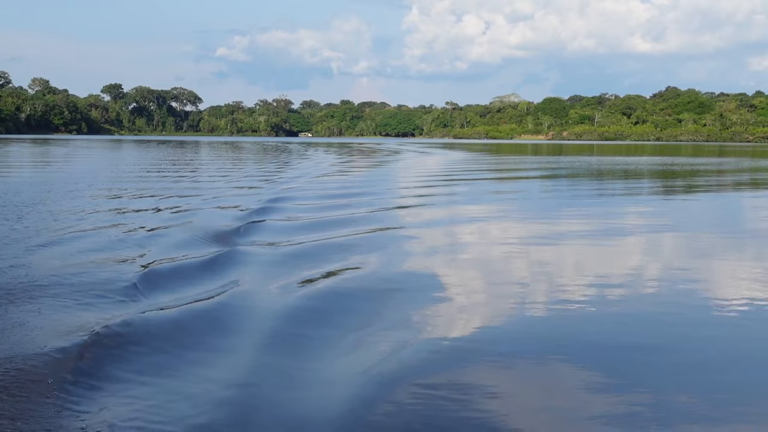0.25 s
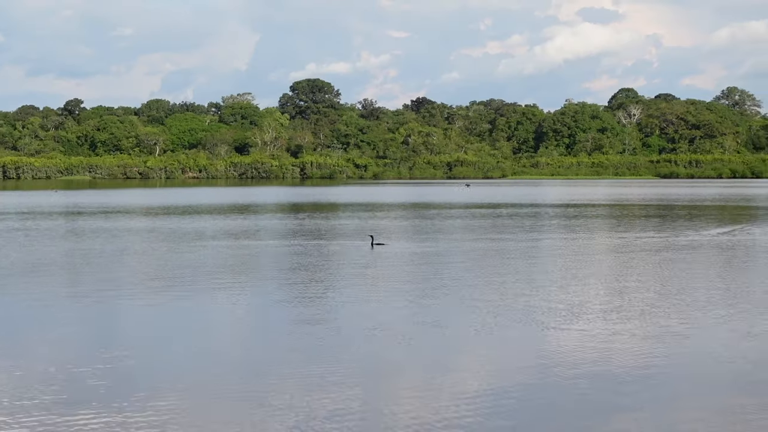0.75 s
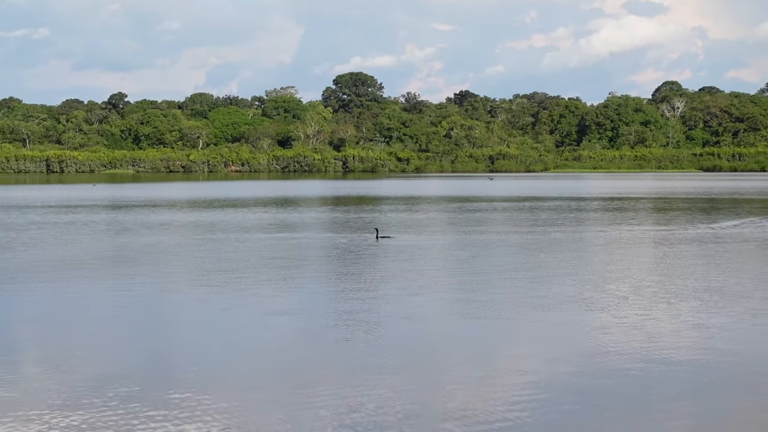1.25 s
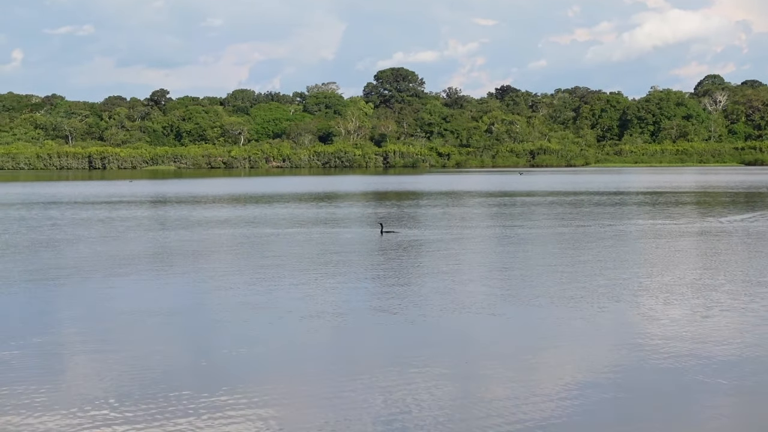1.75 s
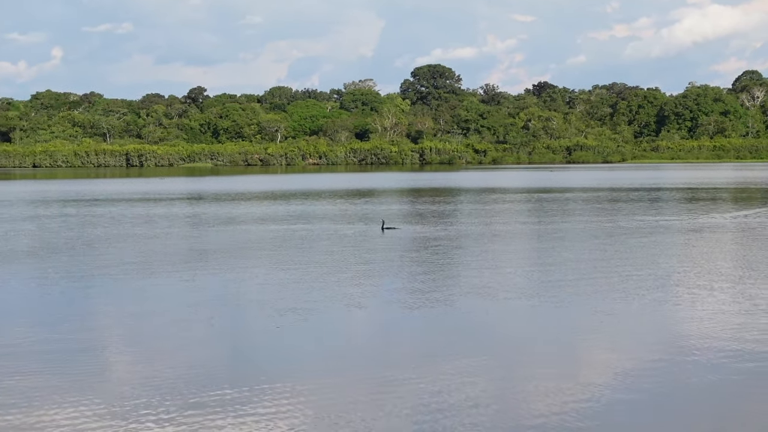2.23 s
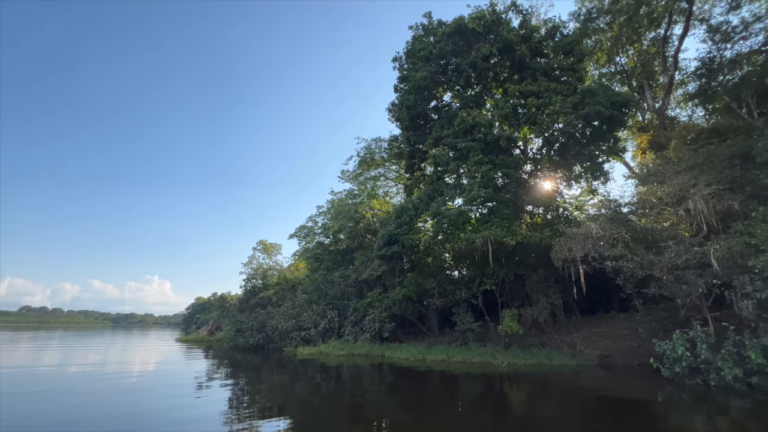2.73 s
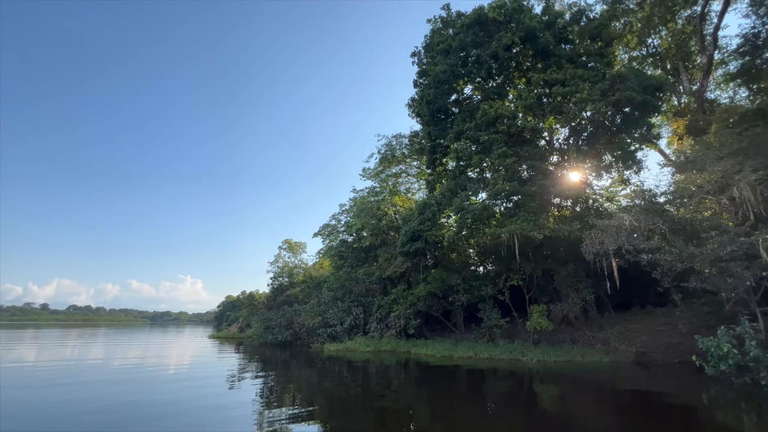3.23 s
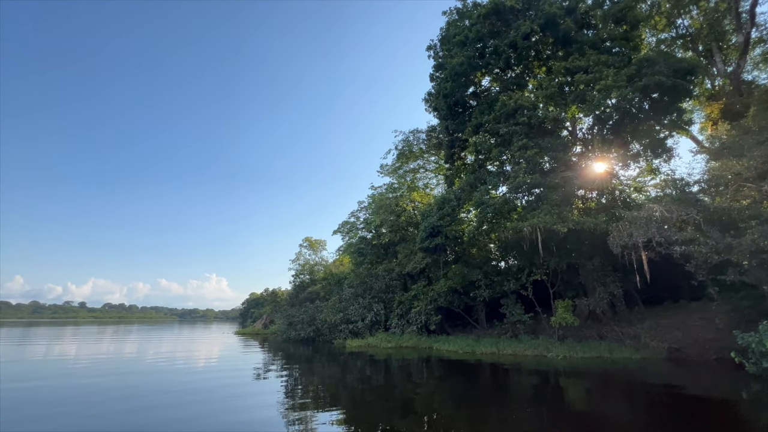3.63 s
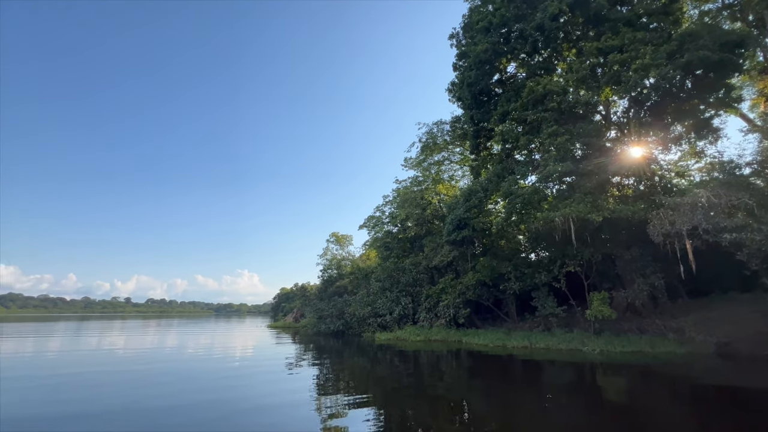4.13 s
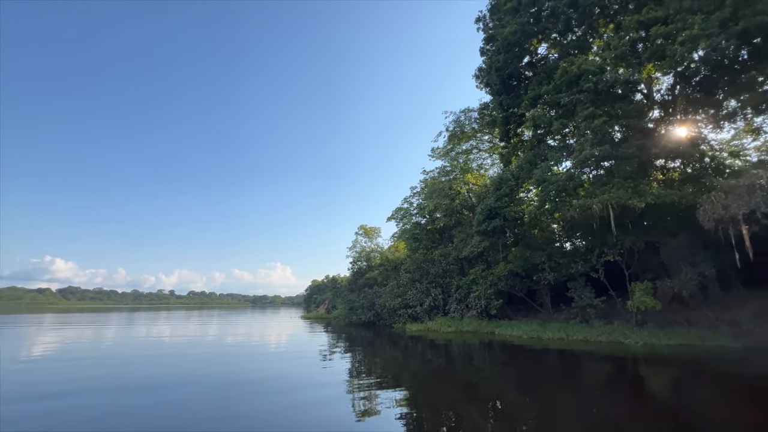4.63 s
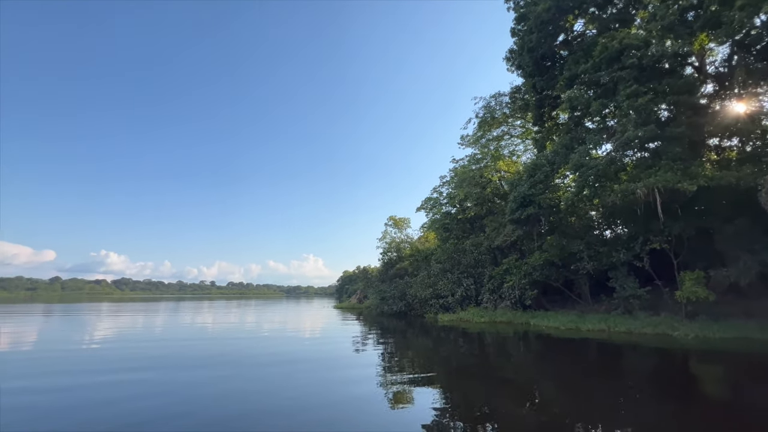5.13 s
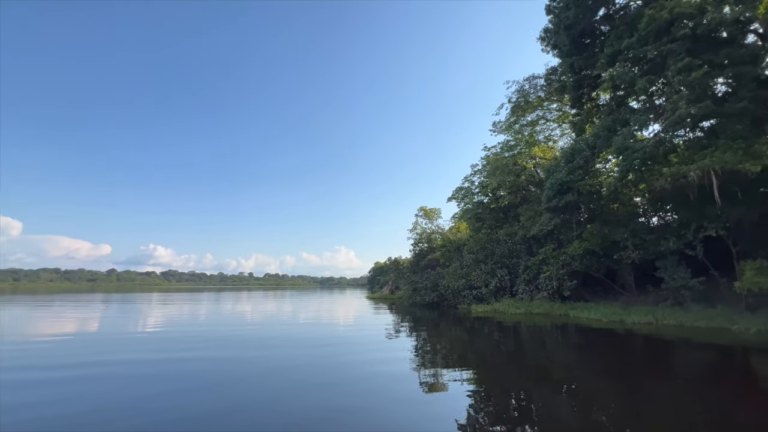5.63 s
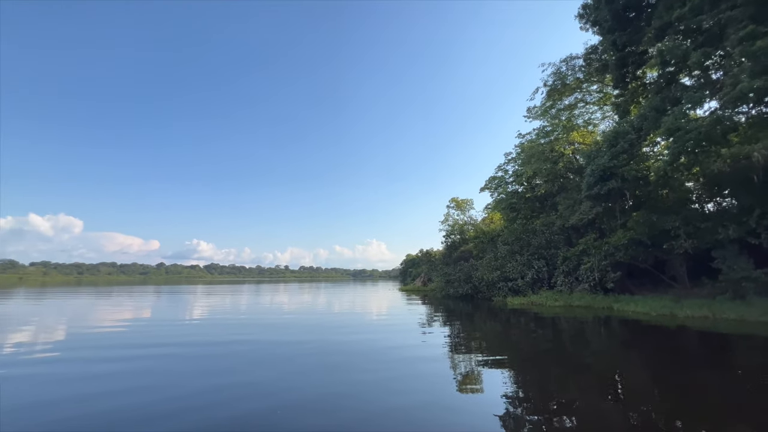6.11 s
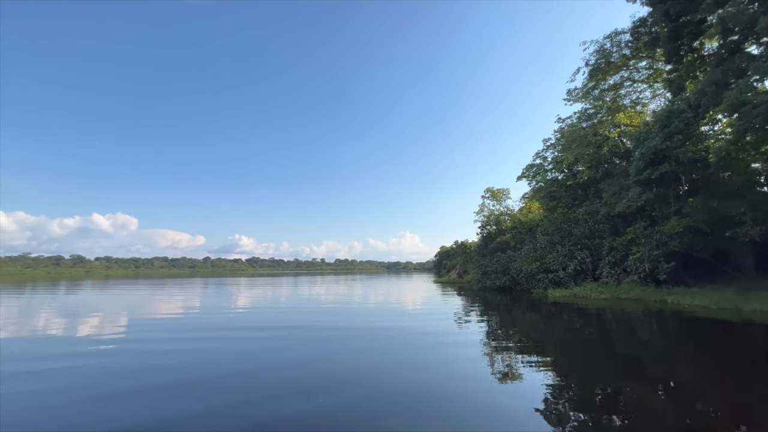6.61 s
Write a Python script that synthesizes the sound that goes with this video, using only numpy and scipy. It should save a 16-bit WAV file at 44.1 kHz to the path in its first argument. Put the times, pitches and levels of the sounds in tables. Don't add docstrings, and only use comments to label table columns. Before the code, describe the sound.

Outdoors on a river boat, close stereo microphone: a steady throbbing motor with exhaust puffs, rattling casing and bright taps, switching abruptly to a second, slightly slower and duller position. The motor drops away and thin, high insect song takes over, very quiet by comparison, with water washing the hull, hissing leaves and brief bird whistles. Light cracks on planks come first, stronger booming knocks later.

```python
import sys
import numpy as np
from scipy import signal
from scipy.fft import rfft, irfft, next_fast_len
from scipy.io import wavfile
from scipy.ndimage import uniform_filter1d

SR = 44100
rng = np.random.default_rng(int(sys.argv[2]) if len(sys.argv) > 2 else 0)


def transcribe(signal):
    frames = np.atleast_2d(signal).T
    limited = np.clip(frames, -1, 1)
    pcm = np.round(limited * 32767).astype(np.int16)
    wavfile.write(sys.argv[1], SR, pcm)


def gain_from_db(level_db):
    decades = np.asarray(level_db, float) / 20
    return 10 ** decades


N = 302526
TIME = np.arange(N) / SR
LATER = TIME[int(2.5 * SR):]
FOREST_TOP_HZ, TOP_HZ = 9700, 15790

# time in seconds, firings a second.
SPEED = [
    [(0.0, 18.17), (0.737, 18.17)],
    [(0.737, 16.4), (1.4, 16.3), (1.5, 16.1), (2.6, 16.1)],
]
FIRST_FIRING = [.04, .36]
# exhaust in dB, casing in dB, clatter in dB, spray in dB.
SEAT_LEVELS = [(-17.5, -13.5, -26, -44.5), (-18.5, -16, -29, -49)]
FADE_OUT_S = (2.284, 2.5915)
# frequency in Hz, left minus right in dB.
SEAT_BALANCE = [
    [(60, -3), (180, -0.5), (550, 1), (1650, 1.5), (4970, 2), (15000, -3)],
    [(60, 2), (180, 1.4), (550, 3), (1650, 6), (4970, 8), (15000, -0.5)],
]
# frequency in Hz, likeness (1 is identical).
SEAT_ALIKE = [(60, .998), (180, 1), (550, 0.99), (1650, .99), (4970, 1), (15000, 0.98)]

# frequency in Hz, level in dB.
ORDER_LEVELS = [(16, -39), (36, -32.5), (70, -11), (95, -4.5), (200, -2.5), (360, -4.5), (470, -11.5)]
ODD_ORDERS_DB = [-0.5, -2]
ORDER_TILT_DB = [1.5, -1]
# frequency in Hz, width in Hz, boost in dB.
PIPE_MODES = [(102.8, 24, 1.5), (164.6, 15, 2), (205, 20, 4), (254.3, 10, 3), (340, 33, 6), (406, 30, -1)]
# start in seconds, length in seconds, order, lift in dB.
HUMS = [(.72, .22, 10, 9), (.9, .22, 12, 8), (1.08, .27, 10, 10), (1.12, .12, 12, 4), (1.28, .18, 16, 5),
        (1.5, .3, 14, 9), (1.54, .22, 12, 7), (1.9, .16, 22, 5), (2.0, .12, 12, 4), (2.1, .14, 13, 6),
        (2.08, .2, 22, 4)]
# frequency in Hz, level in dB.
ROAR_COLOUR = [(20, -83.5), (45, -50), (80, -35), (130, -6.5), (200, -1), (350, -5.5), (520, -15.5),
               (800, -24), (1600, -120)]

# frequency in Hz, level in dB.
CASING_COLOUR = [(100, -120), (250, -28.5), (420, -4), (800, -7.5), (1300, -5.5), (1800, -7.5),
                 (2400, -18.5), (3200, -58), (6000, -120)]
# frequency in Hz, width in Hz, boost in dB.
PANELS = [
    [(551, 37.6, 5.5), (706, 47, 5), (906, 37, 9.5), (1033, 134, 11.5), (1143, 28, 5), (1410, 49, 8.5),
     (1506, 95, 3.5), (2090, 190, 8.5)],
    [(520, 67, 5), (693, 110, 6), (930, 85, 4), (1041, 82, 12), (1401, 25, 7.5), (1524, 68, 4.5),
     (1899, 47, 9.5), (2043, 210, 5.5)],
]
# place as part of a cycle, lift in dB.
VALVES = [
    [(.14, 2), (.54, 4), (.66, 3), (.86, 2)],
    [(.13, 3.5), (.63, 2.5), (.3, 1.5), (.85, 1)],
]
# frequency in Hz, level in dB.
CLATTER_COLOUR = [(800, -120), (1700, -28), (2300, 0), (3000, -5), (4000, -8), (6000, -13), (8000, -21),
                  (11000, -35.5), (16000, -80)]
# frequency in Hz, width in Hz, boost in dB.
FINS = [(2550, 50, 4), (2760, 37, -3), (3035, 53, 5), (3246, 88, 5.5), (3740, 100, -1)]
# place as part of a cycle, dB against the clatter.
COVER_PING = [(.69, 2.5), (.15, -8)]

# frequency in Hz, level in dB.
SPRAY_COLOUR = [(2500, -120), (5000, -29.5), (8000, -3.5), (10000, -5), (13000, -6), (15800, -10.5)]
# frequency in Hz, width in Hz, boost in dB.
SHEEN = [
    [(8710, 500, 3), (9840, 700, 5.5), (12000, 800, 1)],
    [(8500, 600, 1)],
]
# place as part of a cycle, lift in dB.
SPURTS = [
    [(.17, 6), (.63, 1.5), (.9, 4)],
    [(.19, 3), (.68, 2)],
]
SPRAY_DIES_S = (2.5, 2.575)

# time in seconds, peak in dB.
NEAR_TAPS = [(0.0323, -23.5), (0.0937, -29), (0.1426, -25), (0.197, -14.5), (0.2528, -14.5), (0.3072, -14),
             (0.3671, -19.5), (0.4728, -18.5), (0.5033, -17.5), (0.5282, -18), (0.5821, -13.5),
             (0.614, -20), (0.6365, -20.5), (0.6928, -15)]
# time in seconds, peak in dB.
FAR_TAPS = [(0.7673, -29.5), (0.951, -35.5), (0.9804, -32), (1.0118, -29), (1.0736, -32.5), (1.132, -27.5),
            (1.2233, -30.5), (1.2477, -31.5), (1.2824, -29.5), (1.3164, -25), (1.347, -25.5), (1.408, -27),
            (1.4404, -25), (1.5344, -29), (1.5635, -31.5), (1.5959, -28), (1.6897, -29), (1.7484, -26),
            (1.7795, -29.5), (1.8094, -27.5), (1.8753, -29.5), (1.9348, -28), (1.9975, -33.5),
            (2.0918, -29.5), (2.1252, -26.5), (2.1864, -31), (2.245, -33), (2.2769, -39), (2.3088, -35),
            (2.3702, -31), (2.3991, -36), (2.4385, -38), (2.4635, -34.5), (2.4959, -37)]
# frequency in Hz, level in dB.
TAP_COLOUR = [
    [(2500, -58.5), (3800, -7), (5500, -3), (8000, -4), (10000, -17), (15800, -30)],
    [(1800, -61), (3000, -0.5), (5000, 3.5), (7500, -3), (10000, -12), (15800, -15)],
]

# time in seconds, level in dB.
FADE_IN = [(2.53, -25), (2.56, -2.5), (2.59, 0.5)]
# frequency in Hz, half width in Hz, level in dB, left minus right in dB.
INSECTS = [(5320, 250, -85, -7.5), (6016, 260, -53, -4), (6170, 134, -49, -4), (6420, 31, -55, -12),
           (6530, 130, -63, -4), (6800, 170, -52, -2.2), (7000, 80, -47.5, -1.2), (7500, 500, -59.5, -1),
           (8137, 110, -47.5, -3), (8420, 130, -44.5, -1), (8864, 190, -41.5, -1), (9390, 140, -54.5, -1.5)]
# chirp lift in dB, wing-stroke depth in dB.
SINGERS = [(0, 1), (-2, 3.5), (3.5, 2.5), (-3, 1), (1, 1), (5, 1.1), (11, 1.7), (-2, 8), (27, 0.5),
           (7.5, 0.5), (8.5, 0), (9, 2.5)]
# chirps a second, first chirp in seconds, open share, wing strokes a second.
RHYTHMS = [(8, 2.7, .5, 40), (12.42, 2.672, .3, 62), (12.42, 2.672, .25, 49.7), (24.86, 2.685, .35, 49.7),
           (6, 2.7, .5, 45), (3.89, 2.81, .5, 108), (3.89, 2.81, .5, 67), (5, 2.7, .5, 40),
           (12.71, 2.721, .6, 50.83), (12.69, 2.718, .5, 50.8), (14.04, 2.701, .5, 54.5),
           (14.58, 2.676, .5, 48.3)]
# start in seconds, length in seconds, lift in dB.
FAINT_BOUTS = [
    (3.74, .42, 22),
    (4.55, 0.85, 19.5),
    (5.55, 1.25, 22),
]
# start in seconds, length in seconds, lift in dB.
LOW_BOUT = [
    (2.2, 2.52, 4),
]
# start in seconds, length in seconds, share of its lift gained.
SOLO_BOUT = [
    (3.4, 3.25, 1),
]

# frequency in Hz, level in dB.
LAPPING = [(20, -23), (60, -13), (130, -1.5), (200, 1), (400, -3), (700, -11), (1100, -30), (2000, -120)]
# frequency in Hz, level in dB.
WASH = [(200, -120), (500, -0.5), (800, -3.5), (1050, 0.5), (1250, -2), (1550, -0.5), (1800, -6),
        (2800, -10.5), (3400, -22), (5000, -120)]
# frequency in Hz, level in dB.
LEAVES = [(1200, -120), (2400, -4), (3100, -3.5), (4800, -0.5), (5500, 5), (6200, -15), (8000, -120)]
# frequency in Hz, level in dB.
TWIGS = [(2000, -120), (2700, -6.5), (3200, -3.5), (3700, -3), (4200, -12), (5000, -120)]
# start in seconds, length in seconds, lift in dB.
ROCKING = [
    (5.75, 1.3, 3),
]
# start in seconds, length in seconds, lift in dB.
RIPPLES = [
    (3.6, 0.71, 1),
    (4.45, 2.6, 3),
]
# start in seconds, length in seconds, lift in dB.
GUSTS = [
    (3.6, 0.7, 5.5),
    (5.8, 0.85, 4.5),
]
# start in seconds, length in seconds, lift in dB.
FLUTTER = [
    (3.33, .45, 13),
]
# frequency in Hz, level in dB.
AIR = [(12900, -120), (13200, -12), (13800, -6), (14000, 0), (14500, -4), (15650, -6), (15780, -120)]

# time in seconds, crack in dB, boom in dB, snap in dB, left minus right in dB.
KNOCKS = [(3.041, -59, -50.5, -77, 4), (3.129, -63, -48, -81, 4), (3.55, -51, -64, -77, -3),
          (3.83, -70, -70, -58, -1), (3.981, -42.5, -60, -70, 1.5), (4.499, -52.5, -68, -77.5, 1),
          (5.647, -32, -38.5, -59, 1), (5.844, -36, -40.5, -66, 1), (6.353, -38, -41.5, -33, 6),
          (6.393, -44, -46, -58, 1), (6.711, -53.5, -62, -60, .5)]
# frequency in Hz, width in Hz, boost in dB.
PLANK = [(1090, 74, -2.5), (1268, 70, 6.5), (1450, 86, -2), (1690, 240, 0), (2130, 400, 7),
         (2630, 180, 4.5), (2964, 140, 6)]
# frequency in Hz, width in Hz, boost in dB.
HULL = [(135, 28, 10), (192, 14, 14.5), (260, 72, 10.5), (409, 33, 10), (604, 42, 1)]
# start in seconds, frequency in Hz, level in dB, 60 dB decay in seconds.
HULL_DRUM = [(5.66, 231, -41.5, 0.51), (5.68, 135, -43, 0.52), (5.871, 135, -45.5, 0.56),
             (5.87, 260, -43.5, 0.58), (6.362, 315, -39, 0.36), (6.369, 236, -37, 0.22),
             (6.412, 192, -27.5, 0.26), (6.445, 198, -35, 0.23), (6.362, 630, -43, 0.13),
             (6.394, 583, -51, .15), (6.4, 297, -40, .3), (6.399, 390, -41, .25), (6.465, 297, -41, 0.25),
             (6.48, 188.5, -40, .3), (6.5, 399, -46, 0.25), (6.565, 217, -42, 0.22)]
# start in seconds, length in seconds, from Hz, to Hz, level in dB.
BIRD = [(3.44, .04, 3850, 3830, -67), (3.49, .04, 3520, 3680, -68), (3.545, .03, 3600, 3400, -70),
        (3.585, .035, 3460, 3440, -72), (3.62, .035, 3480, 3780, -63), (3.655, .045, 3780, 3520, -61),
        (3.7, .055, 3520, 3350, -65), (3.826, .012, 4350, 3750, -62), (4.065, .02, 4560, 4520, -68),
        (4.12, .025, 4480, 4520, -64), (4.18, .06, 4520, 4400, -71), (5.88, .08, 4300, 4250, -76),
        (6.06, .08, 3500, 3350, -74)]


def unit(x):
    return x / np.sqrt(np.mean(x ** 2) + 1e-20)


def along(points, hz):
    f, v = np.transpose(points)
    return np.interp(np.log(hz + 1), np.log(f + 1), v)


def colour(points):
    return lambda hz: gain_from_db(along(points, hz))


def curve(rows, t):
    s, values = np.transpose(rows)
    return np.interp(t, s, values)


def wobble(rate, size):
    knots = rng.standard_normal(int(size * rate / SR) + 4)
    return np.interp(np.arange(size) * (rate / SR), np.arange(len(knots)), knots)


def boosts(modes, hz):
    peaks = sum(gain_from_db(db) ** 2 / (1 + (2 * (hz - c) / w) ** 2) ** 2 for c, w, db in modes)
    return np.sqrt(1 + peaks)


def noise(size, gain, alike, balance_db):
    m = next_fast_len(size)
    hz = np.fft.rfftfreq(m, 1 / SR)
    angle = np.arccos(np.clip(alike(hz) + 0 * hz, -1, 1)) / 2
    mid, side = rfft(rng.standard_normal((2, m))) * gain(hz) * [np.cos(angle), np.sin(angle)]
    left = (mid + side) * gain_from_db(balance_db(hz) / 2)
    right = (mid - side) * gain_from_db(-balance_db(hz) / 2)
    return unit(irfft(np.array([left, right]), m)[:, :size])


def seat_noise(seat, size, gain):
    return noise(size, gain, lambda hz: along(SEAT_ALIKE, hz), lambda hz: along(SEAT_BALANCE[seat], hz))


def bumps(cycle, places, width):
    return sum(db * np.exp(-((cycle - at) % 1) / width) for at, db in places)


def swells(events, t=LATER, swell_s=0.15):
    return sum(db * np.clip(np.minimum(t - s, s + length - t) / swell_s, 0, 1) for s, length, db in events)


def below(x, top_hz):
    m = next_fast_len(x.shape[1] + SR // 10)
    return irfft(rfft(x, m) * (np.fft.rfftfreq(m, 1 / SR) < top_hz), m)[:, :x.shape[1]]


def firing_orders(seat, rate, t, cycle):
    size = len(rate)
    order = np.arange(1, 27)
    hz = order * rate.mean()
    order_db = along(ORDER_LEVELS, hz) + ODD_ORDERS_DB[seat] * (order % 2)
    order_db = order_db + ORDER_TILT_DB[seat] * np.log2(hz / 200)
    strength = gain_from_db(order_db) * boosts(PIPE_MODES, hz)
    thump_db = 4 * np.clip((16.25 - rate) / .15, 0, 1)
    tones = np.zeros(size)
    for k, gain in zip(order, strength):
        hum_db = swells([(s, length, db) for s, length, which, db in HUMS if which == k], t, 0.047)
        lift_db = thump_db * (k in (5, 6, 8)) + hum_db + min(.15 * k, 2) * wobble(5, size)
        drift = .006 * k * k + min(.11 * k, 1) * rng.normal() + .045 * k * wobble(5, size)
        tones += gain * gain_from_db(lift_db) * np.cos(2 * np.pi * k * cycle + drift)
    return tones * gain_from_db(1.2 * wobble(16.8, size))


def exhaust(seat, rate, t, cycle):
    size = len(rate)
    tones = firing_orders(seat, rate, t, cycle)
    puff = gain_from_db(bumps(cycle, [(0, 4.1), (.5, 2.69)], width=0.14))
    roar = puff * seat_noise(seat, size, colour(ROAR_COLOUR))
    mix = 0.8 * unit(tones) * gain_from_db([[.3], [-.3]]) + .5 * unit(roar)
    return mix * signal.windows.tukey(size, 400 / size)


def casing(seat, cycle):
    size = len(cycle)
    shake = gain_from_db(bumps(cycle, [(.25, 1.8), (.8, 0.66)], width=0.058) + 0.99 * wobble(31.05, size))
    return shake * seat_noise(seat, size, lambda hz: colour(CASING_COLOUR)(hz) * boosts(PANELS[seat], hz))


def clatter(seat, cycle):
    size = len(cycle)
    strikes_db = bumps(cycle, VALVES[seat], width=.055) * (1 + .4 * wobble(18, size))
    metal = seat_noise(seat, size, lambda hz: colour(CLATTER_COLOUR)(hz) * boosts(FINS, hz))
    valves = gain_from_db(strikes_db + 1.2 * wobble(39.55, size)) * metal
    at, ping_db = COVER_PING[seat]
    struck = gain_from_db(ping_db + 2.5 * wobble(18, size)) * np.exp(-((cycle - at) % 1) / .12)
    cover = seat_noise(seat, size, lambda hz: 1 / (1 + ((hz - 2600) / 160) ** 4))
    return unit(valves) + struck * cover * 2


def spray(seat, cycle):
    size = len(cycle)
    spurts_db = 0
    for at, db in SPURTS[seat]:
        distance = (cycle - at + .5) % 1 - .5
        spurts_db = spurts_db + db * np.exp(-np.square(distance / 0.0786))
    gate = gain_from_db(spurts_db * (1 + 0.26 * wobble(25, size)) + 1.06 * wobble(25, size))
    return gate * seat_noise(seat, size, lambda hz: colour(SPRAY_COLOUR)(hz) * boosts(SHEEN[seat], hz))


def engine(seat):
    rows = SPEED[seat]
    span = slice(round(rows[0][0] * SR), round(rows[-1][0] * SR))
    t = TIME[span]
    rate = curve(rows, t)
    cycle = np.cumsum(rate) / SR - FIRST_FIRING[seat]
    exhaust_db, casing_db, clatter_db, spray_db = SEAT_LEVELS[seat]
    level = gain_from_db(4 * (rate[-1] - rate)) * np.interp(t, FADE_OUT_S, [1, 0])
    parts = gain_from_db(exhaust_db) * unit(exhaust(seat, rate, t, cycle))
    parts += gain_from_db(casing_db) * unit(casing(seat, cycle))
    parts += gain_from_db(clatter_db + 2.5) * unit(clatter(seat, cycle))
    parts += gain_from_db(spray_db + 4.0) * unit(spray(seat, cycle)) * np.interp(t, SPRAY_DIES_S, [1, 0])
    out = np.zeros((2, N))
    out[:, span] = level * parts
    return out


def taps(seat):
    rows = (NEAR_TAPS, FAR_TAPS)[seat]
    tap_db, rise_s, t60_s = [-8.5, 2][seat], 0.00096, 0.037
    t, out = TIME[:SR // 20], np.zeros((2, N))
    for s, db in rows:
        burst = gain_from_db(db + tap_db - 60 * t / t60_s) * (1 - np.exp(-t / rise_s))
        out[:, round(s * SR):][:, :len(t)] += burst
    span = slice(round(rows[0][0] * SR), round(rows[-1][0] * SR) + len(t))
    out[:, span] *= seat_noise(seat, span.stop - span.start, colour(TAP_COLOUR[seat]))
    return out


def insects():
    low_db, faint_db = swells(LOW_BOUT) - 2, swells(FAINT_BOUTS)
    solo = .45 + swells(SOLO_BOUT) / 2
    turn = gain_from_db([[.5], [-.5]] * (1 - .18 * (LATER - LATER.mean())))
    size, out = len(LATER), 0
    for kind, singer, rhythm in zip(INSECTS, SINGERS, RHYTHMS):
        hz, width_hz, db, pan_db = kind
        lift_db, depth_db = singer
        rate, first, share, pulses = rhythm
        place = (rate * (LATER - first) + .5) % 1 - .5
        chirp = np.clip(5 - 10 * np.abs(place) / share, 0, 1)
        chirp = chirp * (solo if 6600 < hz < 7200 else .5)
        strokes = np.cos(2 * np.pi * pulses * (LATER - first) + .8 * wobble(4.5, size))
        song_db = lift_db * (0.5 + 0.081 * wobble(4, size)) + 2 * depth_db * strokes
        gate = gain_from_db(chirp * song_db + 0.19 * wobble(30, size))
        band = noise(size, lambda f: 1 / (1 + ((f - hz) / width_hz) ** 4), lambda f: .85, lambda f: 0)
        bout_db = faint_db if hz < 5500 else low_db if hz < 6600 else 0
        out = out + gain_from_db(db + bout_db) * turn ** pan_db * unit(gate * band)
    return out


def shore():
    size, out = len(LATER), 0
    layers = [(-55.5 + swells(ROCKING), LAPPING, 2.3), (-60 + swells(RIPPLES), WASH, 1.6),
              (-67 + swells(GUSTS), LEAVES, 1.3), (-79 + swells(FLUTTER), TWIGS, 2.5)]
    for db, points, lump_db in layers:
        hiss = noise(size, colour(points), lambda hz: .45, lambda hz: -.5)
        out = out + gain_from_db(db + lump_db * wobble(14, size)) * hiss
    return out


def air():
    hiss = noise(len(LATER), colour(AIR), lambda hz: .99, lambda hz: -.2)
    z = signal.stft(hiss, nperseg=1024)[2]
    field = uniform_filter1d(rng.standard_normal(z.shape[1:]), size=5, axis=0)
    field = unit(uniform_filter1d(field, size=2, axis=1))
    spells = unit(uniform_filter1d(rng.standard_normal(z.shape[2]), size=5))
    flecks = z * (field + .45 * spells > 1.15)
    return gain_from_db(-73) * signal.istft(flecks, nperseg=1024)[1][:, :len(LATER)]


def knock(t, crack_db, boom_db, snap_db, pan_db):
    ring_s = .1 if boom_db > -46 else 0.039

    def burst(points, modes=()):
        return noise(len(t), lambda hz: boosts(modes, hz) * colour(points)(hz), lambda hz: .85, lambda hz: pan_db)

    crack = burst([(200, -80), (500, -5), (1100, 2.0), (3000, -4.0), (4700, -16), (5200, -42), (9000, -100)], PLANK)
    snap = burst([(1000, -90), (2500, -26), (3500, -4), (5000, 7.0), (8000, 5), (9700, -14)])
    boom = burst([(50, -27.5), (110, 7.5), (600, 6.5), (1000, -19), (2500, -70)], HULL)
    answer = burst([(200, -58), (600, 1), (1500, 1), (2300, -17), (4000, -63)], PLANK)
    tones = 0
    for hz, _, db in PLANK:
        fall_db = 60 * t * hz / (1700 * ring_s)
        tones = tones + gain_from_db(db - 18 + rng.normal(0, 2.5) - fall_db) * np.sin(2 * np.pi * hz * t)
    wood = gain_from_db(-60 * t / (1.05 * ring_s)) * crack + tones + gain_from_db(-7 - 60 * t / (3.4 * ring_s)) * answer
    blow = gain_from_db(crack_db) * wood + gain_from_db(snap_db - 60 * t / (0.67 * ring_s)) * snap
    hollow = gain_from_db(boom_db - 60 * t / (8.0 * ring_s)) * (1 - np.exp(-(t / 0.009) ** 2)) * boom
    return blow * (1 - np.exp(-t / 0.00091)) + hollow


def knocks():
    out, size = np.zeros((2, N + SR)), SR // 2
    t = TIME[:size]
    for s, *levels in KNOCKS:
        out[:, round(s * SR):][:, :size] += knock(t, *levels)
    for s, hz, db, t60 in HULL_DRUM:
        fade = gain_from_db(db - 60 * t / t60 + 1.0 * wobble(32, size)) * (1 - np.exp(-t / 0.0042))
        out[:, round(s * SR):][:, :size] += fade * np.sin(2 * np.pi * hz * t)
    return out[:, :N]


def bird():
    size = len(LATER)
    hz, gain = np.zeros(size), np.zeros(size)
    for s, length, from_hz, to_hz, db in BIRD:
        on = (LATER >= s) & (LATER < s + length)
        hz[on] = from_hz + (to_hz - from_hz) * (LATER[on] - s) / length
        gain[on] = gain_from_db(db)
    gain = uniform_filter1d(gain, size=150) * (hz > 0) * gain_from_db(1.8 * wobble(60, size))
    phase = 2 * np.pi * np.cumsum(hz + 25 * wobble(80, size)) / SR
    song = (gain * np.sin(phase))[None]
    trees = rng.standard_normal((2, SR // 2)) * gain_from_db(-60 * TIME[:SR // 2] / .6)
    echoes = signal.fftconvolve(song, trees / np.linalg.norm(trees[0]), axes=1)[:, :size]
    return song * gain_from_db([[-1.5], [1.5]]) + gain_from_db(-5) * echoes


def scene():
    out = engine(0) + engine(1) + taps(0) + taps(1)
    forest = insects() + shore() + knocks()[:, -len(LATER):] + bird()
    forest = below(forest, FOREST_TOP_HZ) + air()
    out[:, -len(LATER):] += gain_from_db(curve(FADE_IN, LATER)) * forest
    return out


def band_limit(x):
    return signal.sosfilt(signal.butter(12, 16570, fs=SR, output="sos"), x)


def record(dry):
    bass_cut = signal.butter(3, 45, "highpass", fs=SR, output="sos")
    thinned = signal.sosfilt(bass_cut, dry)
    squeezed = thinned / (1 + np.abs(thinned / .88) ** 5) ** (1 / 5)
    return band_limit(below(squeezed, TOP_HZ))


dry = scene()
out = record(dry)
transcribe(out)
```